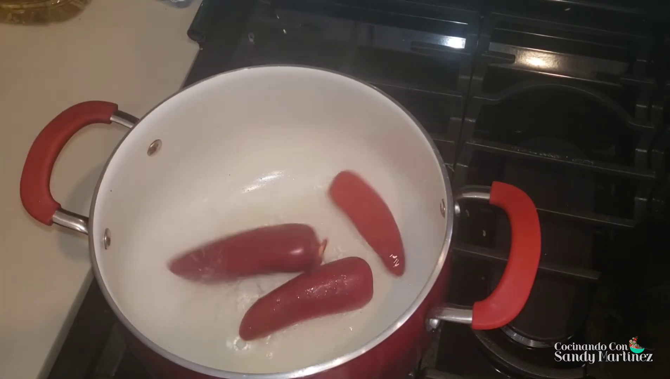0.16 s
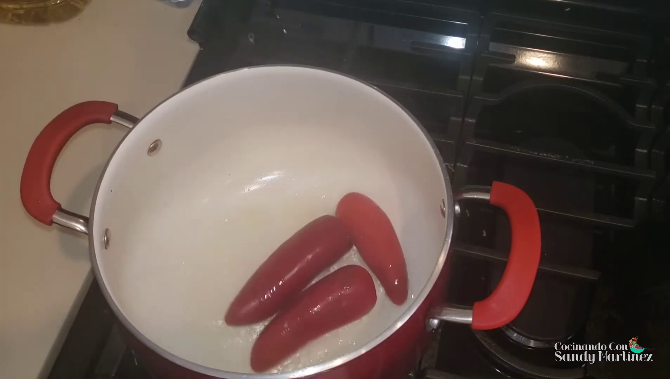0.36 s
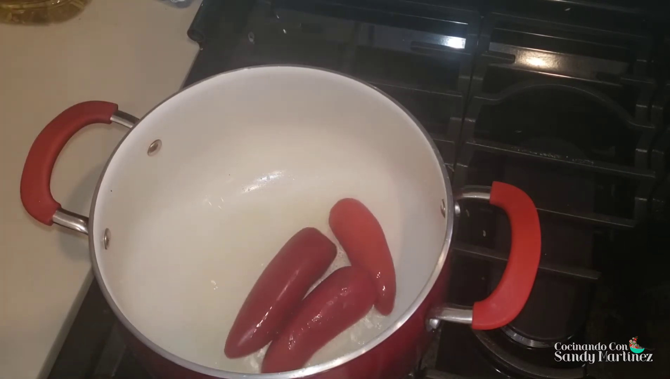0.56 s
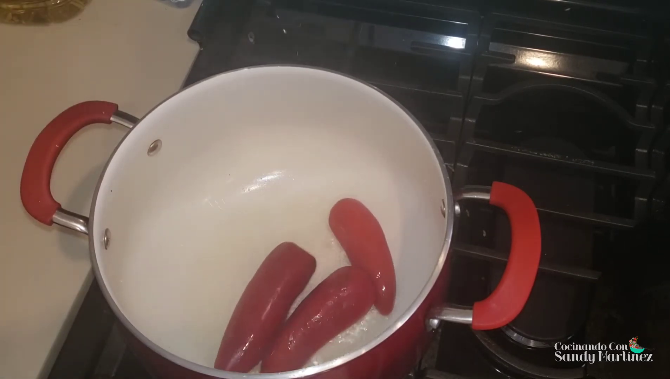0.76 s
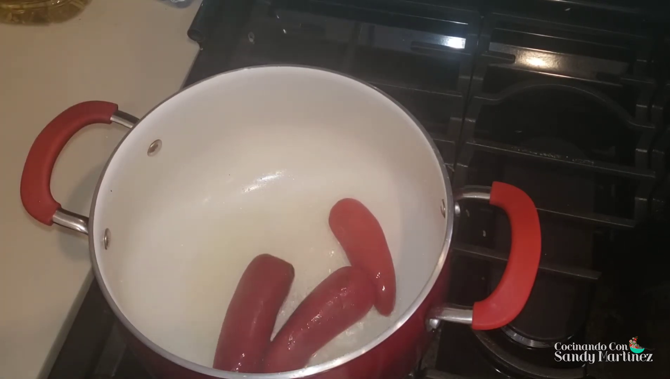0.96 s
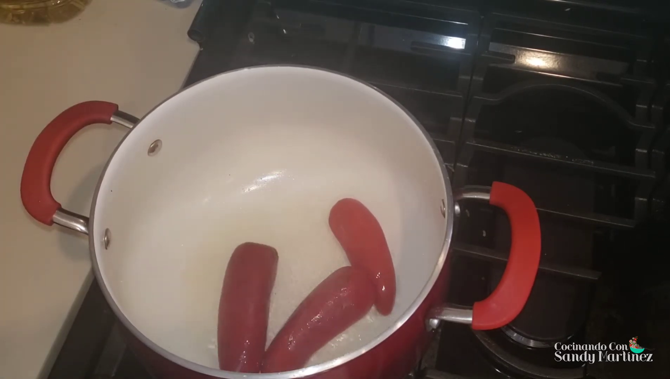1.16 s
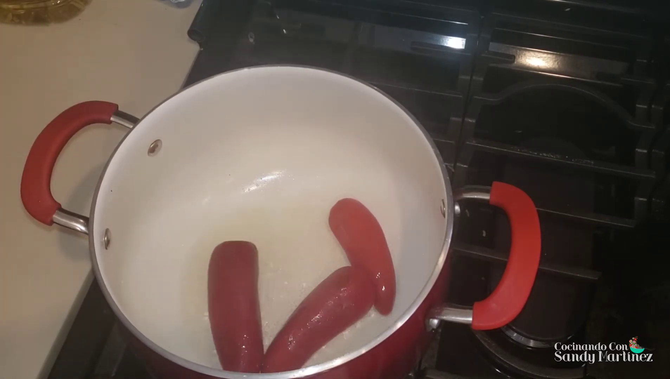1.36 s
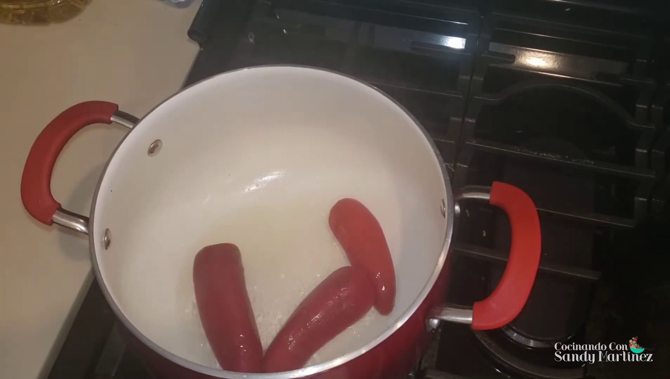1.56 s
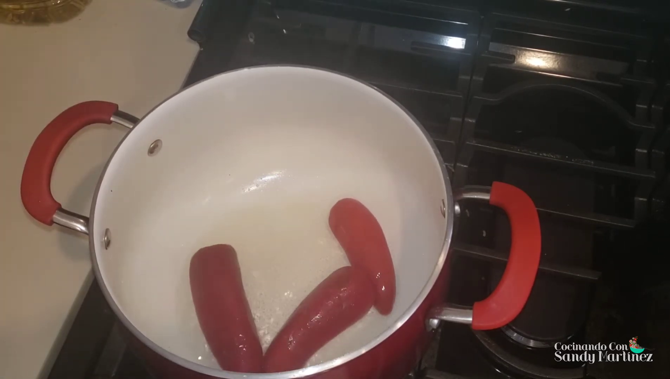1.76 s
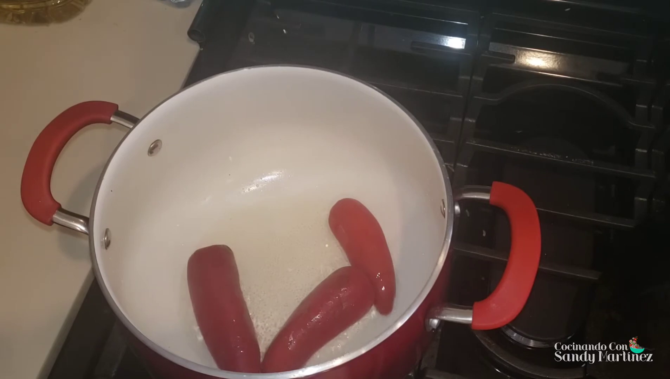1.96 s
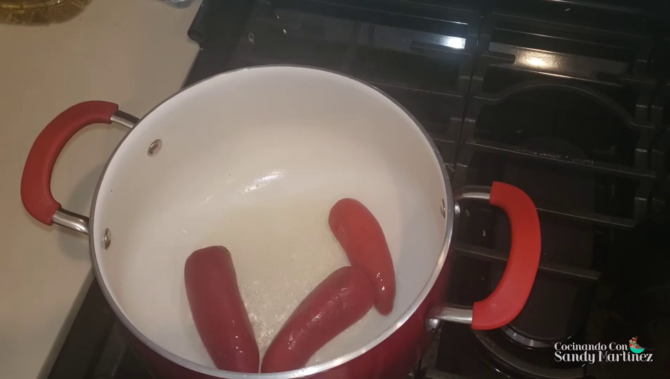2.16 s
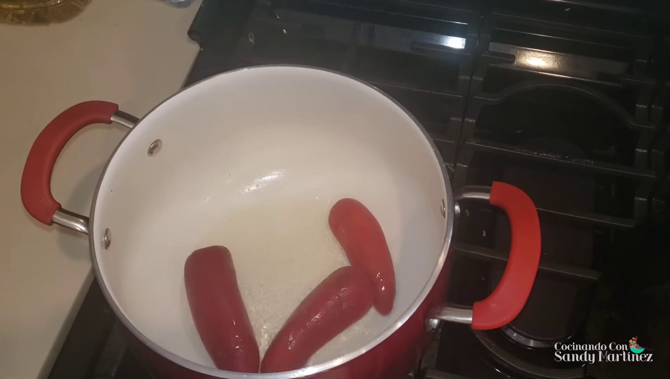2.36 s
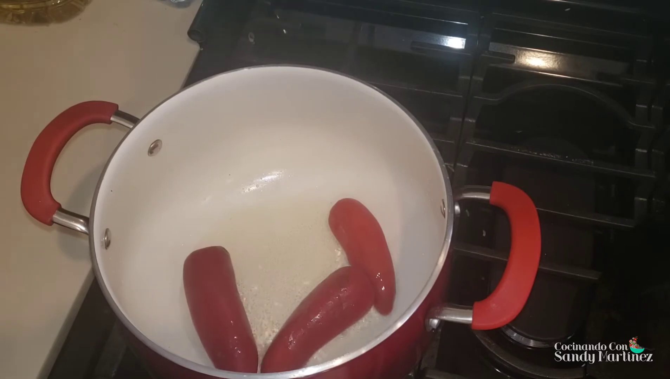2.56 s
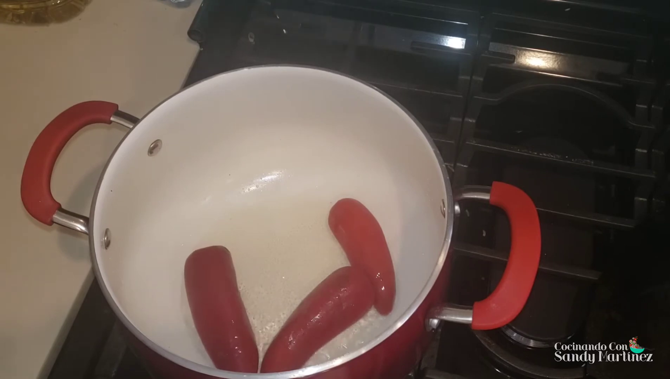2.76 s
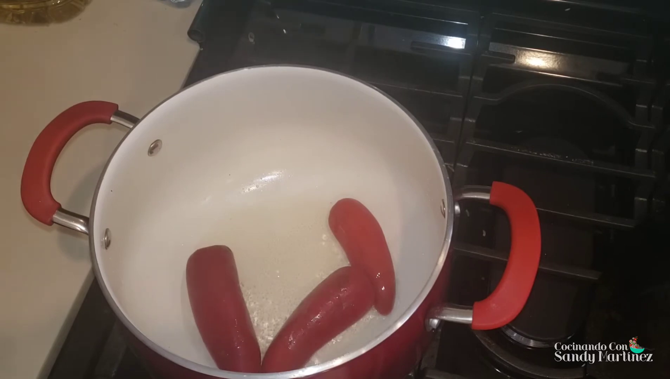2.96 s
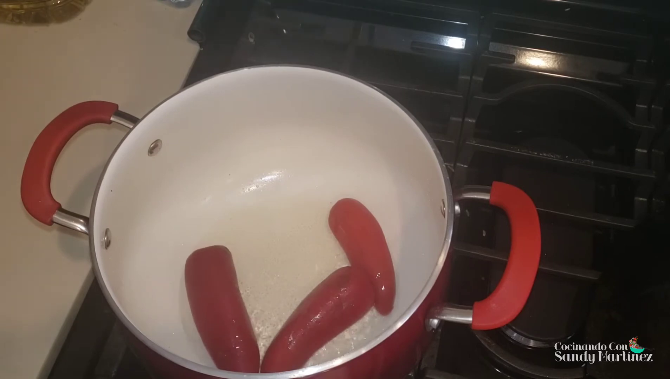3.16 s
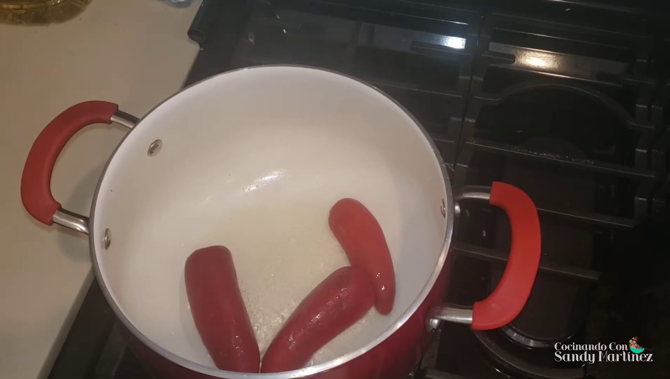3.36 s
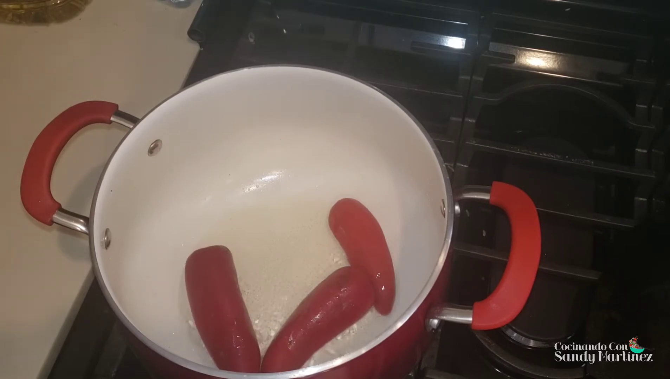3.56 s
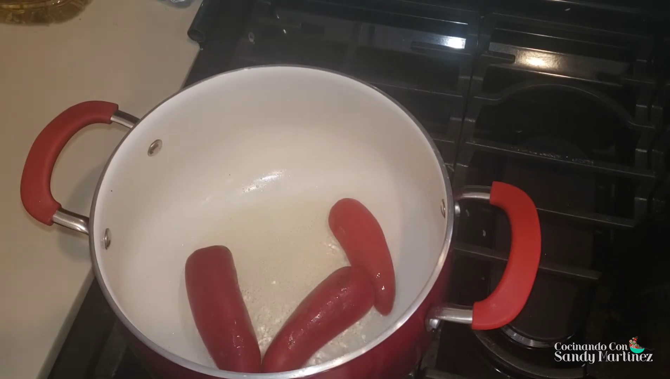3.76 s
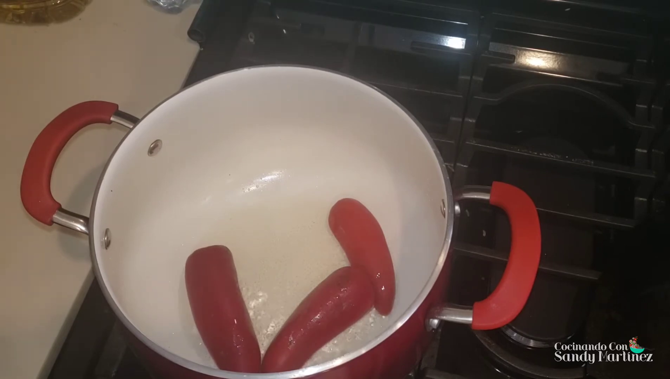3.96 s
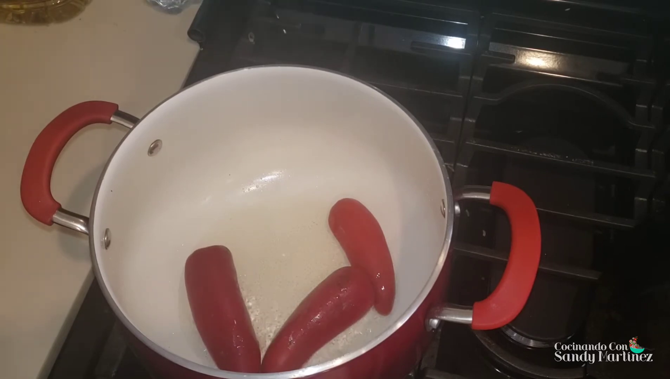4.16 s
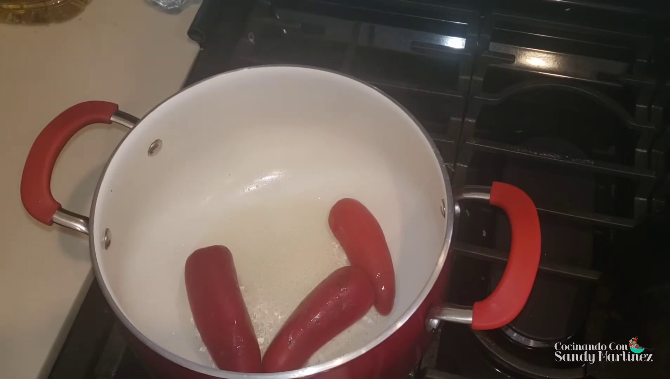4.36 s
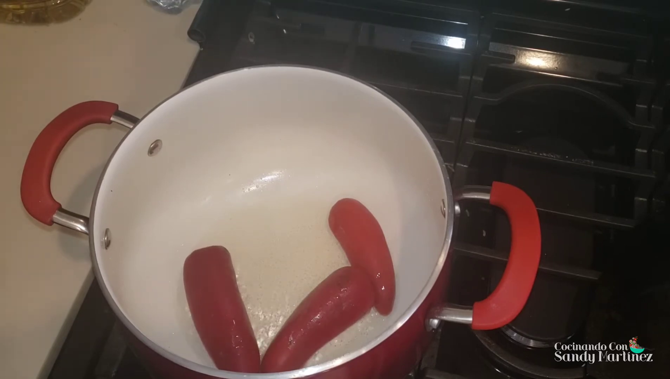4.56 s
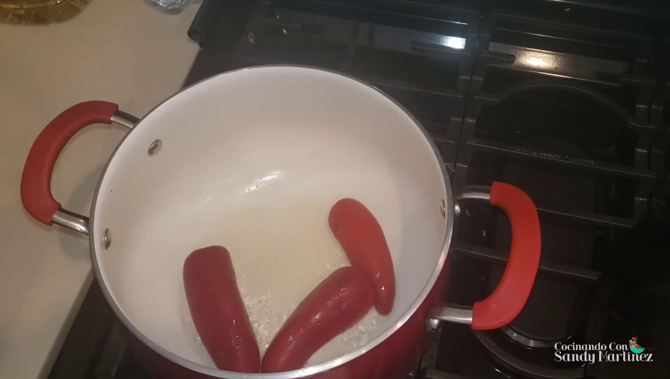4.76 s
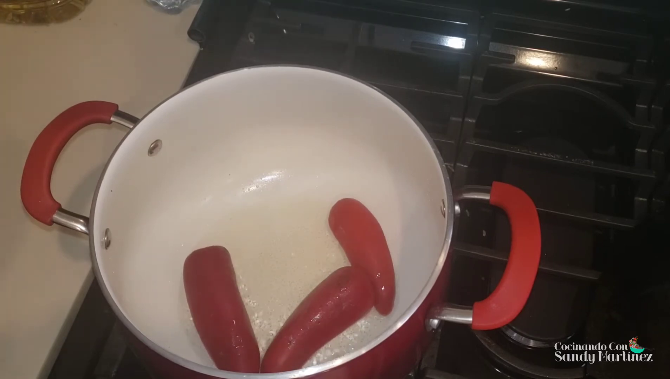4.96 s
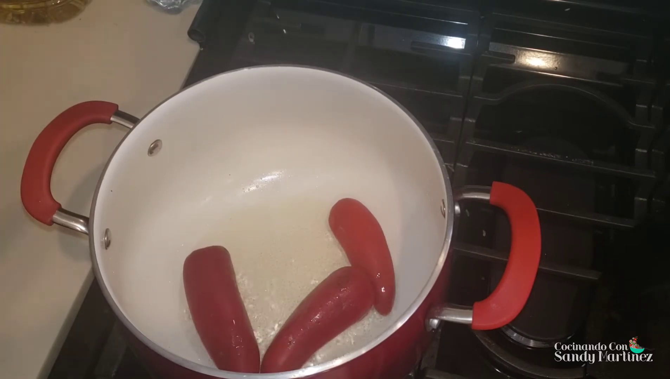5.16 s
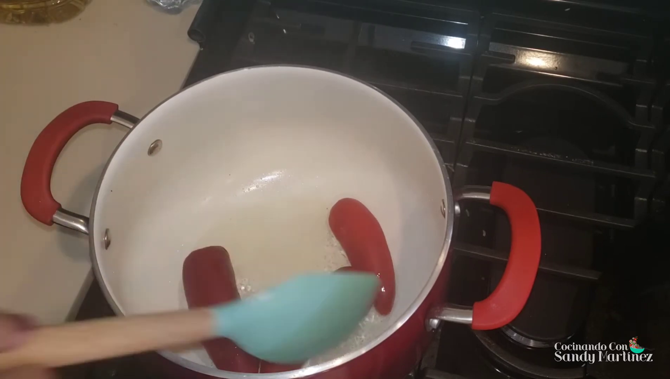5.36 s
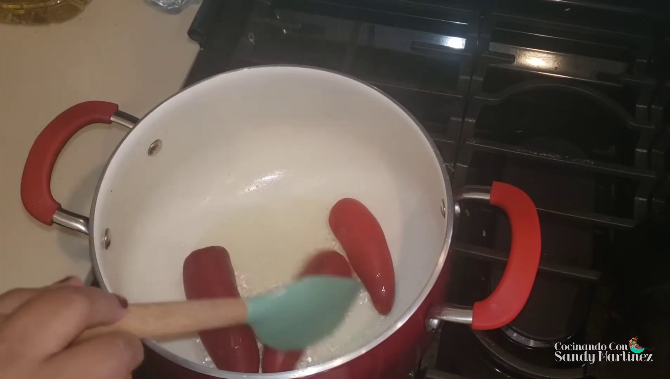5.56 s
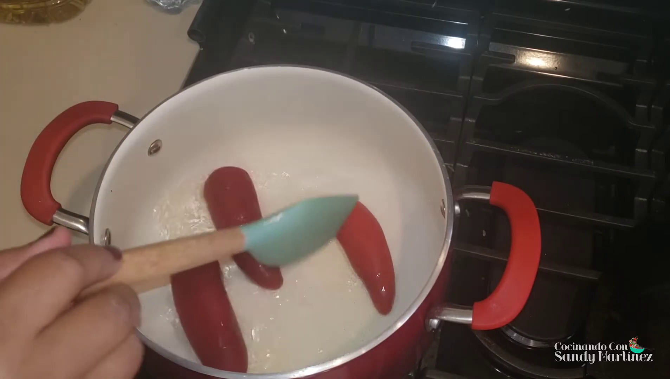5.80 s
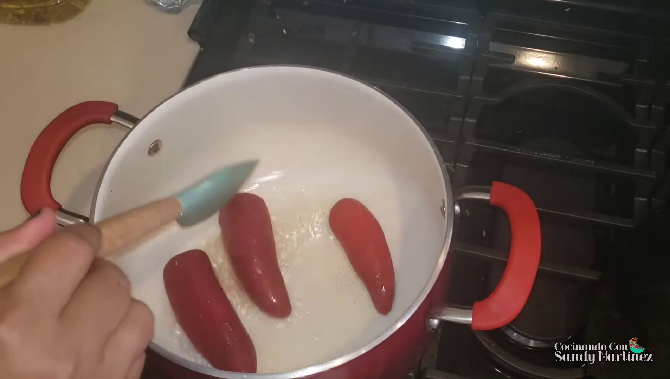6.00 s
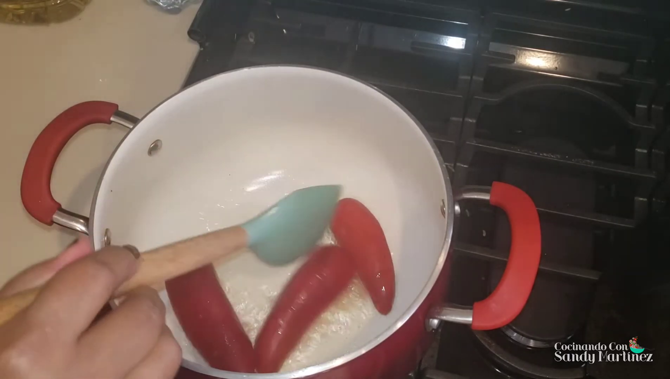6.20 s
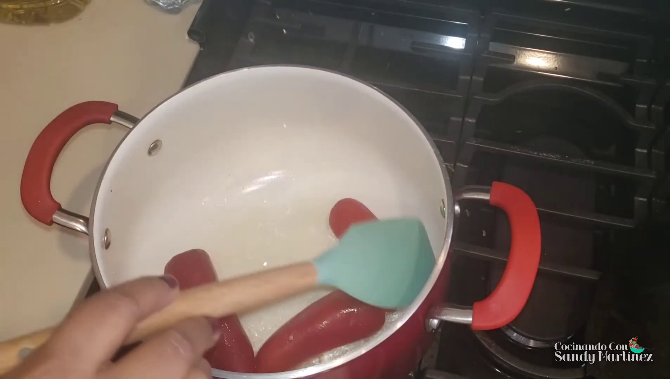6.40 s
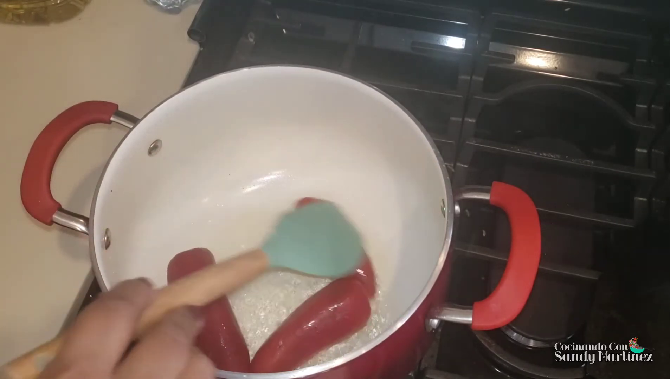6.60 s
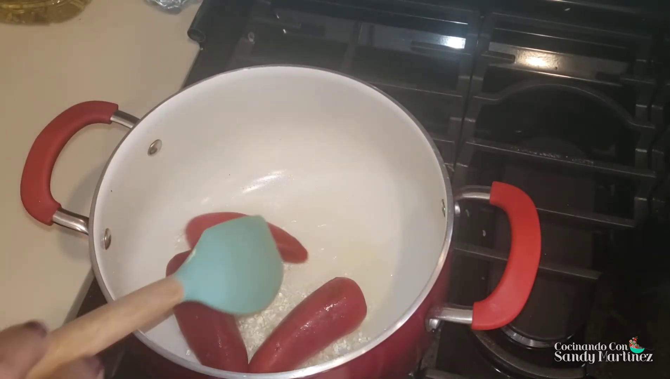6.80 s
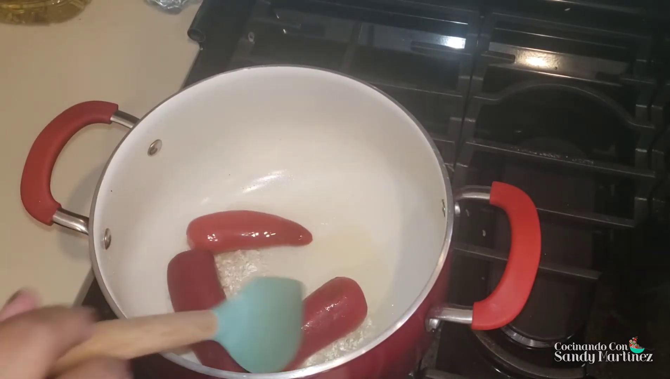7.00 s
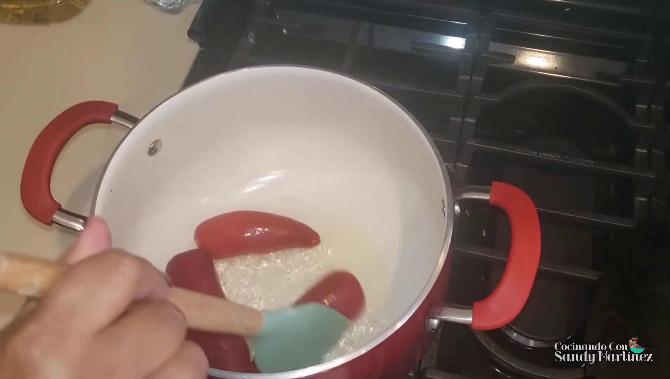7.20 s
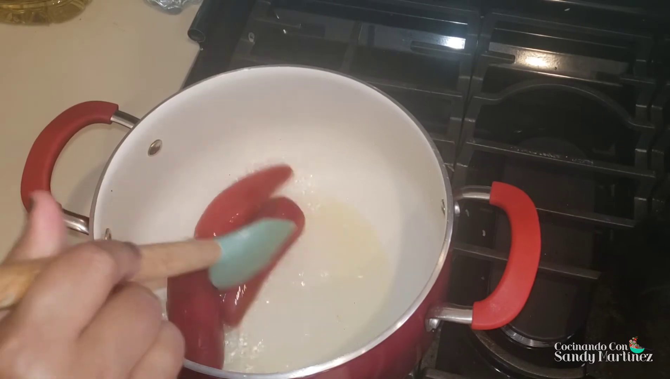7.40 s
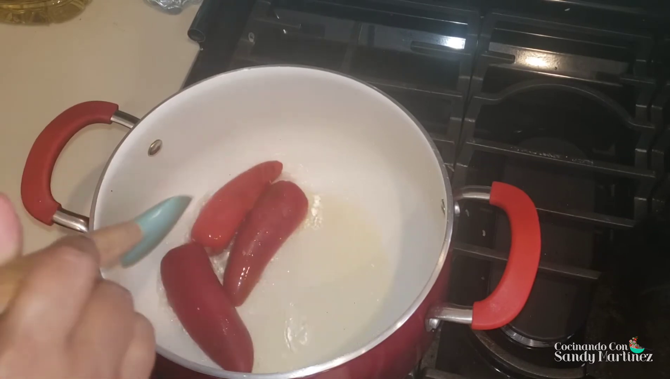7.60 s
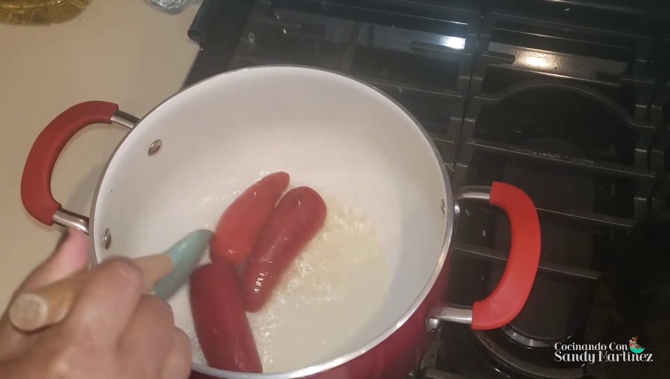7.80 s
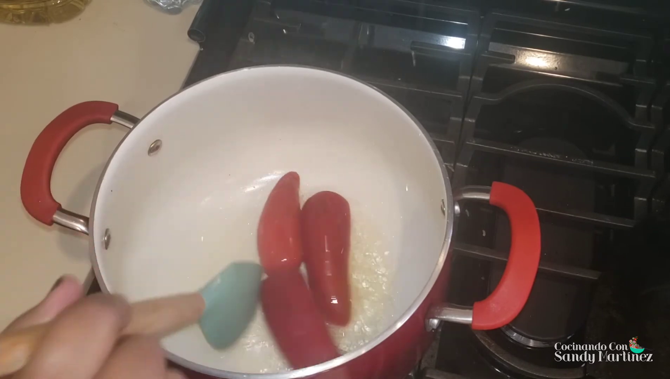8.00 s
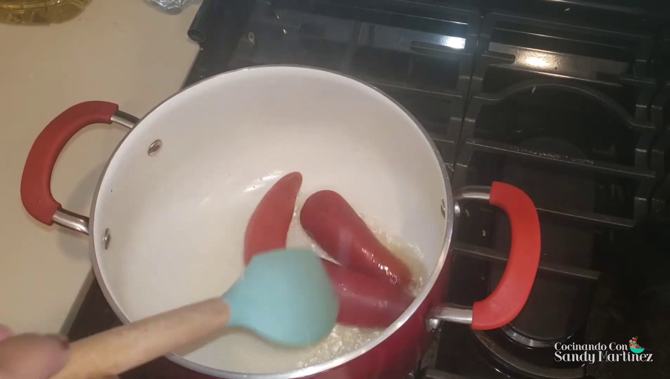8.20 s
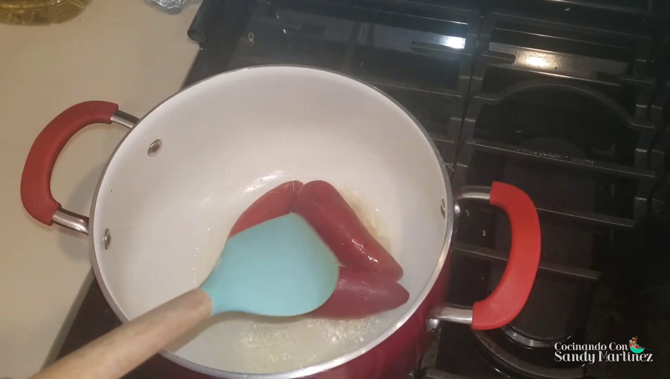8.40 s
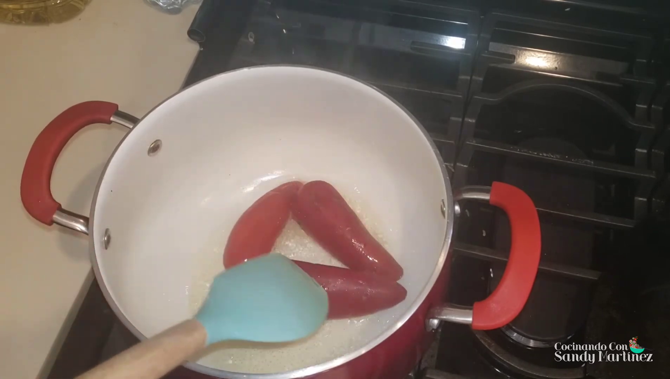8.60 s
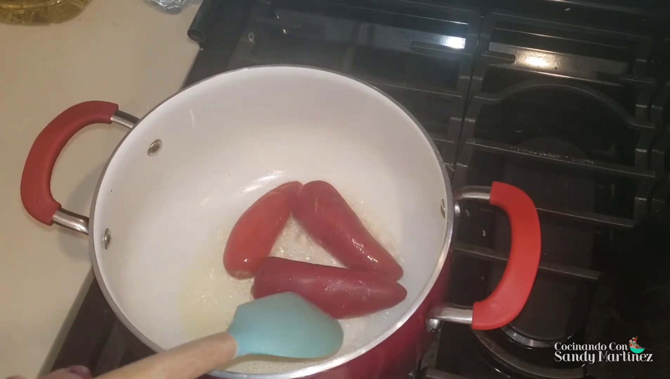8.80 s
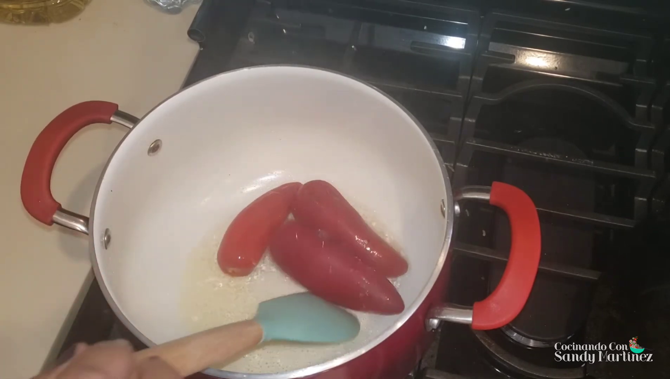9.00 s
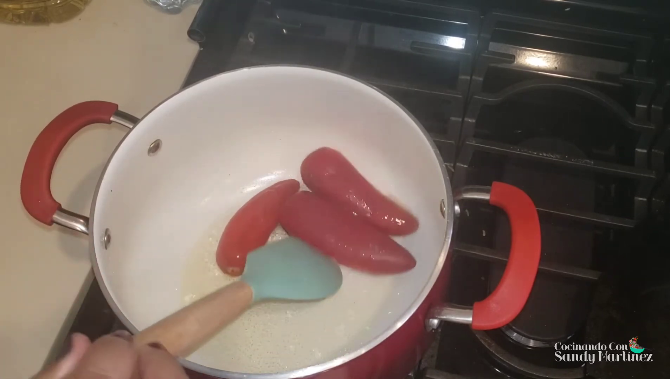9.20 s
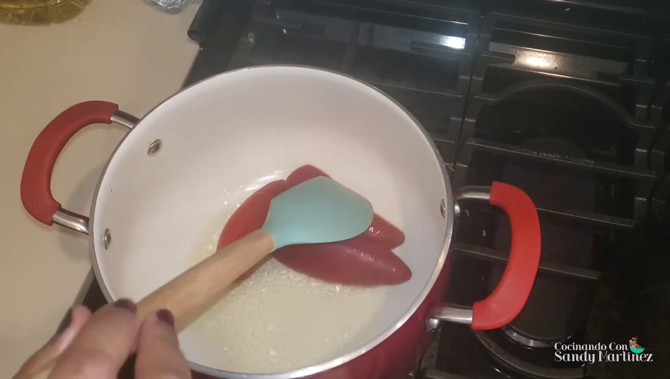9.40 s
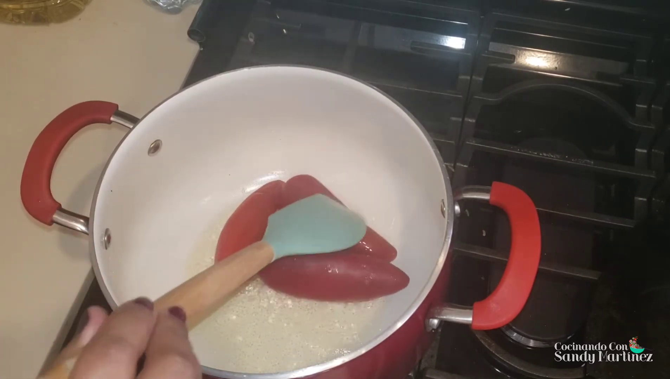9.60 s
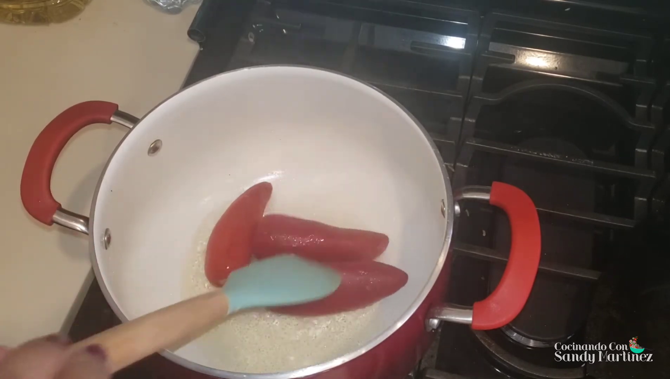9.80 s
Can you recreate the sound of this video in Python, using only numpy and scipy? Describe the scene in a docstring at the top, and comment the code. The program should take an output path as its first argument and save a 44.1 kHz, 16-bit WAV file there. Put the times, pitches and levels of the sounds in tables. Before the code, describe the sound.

Close stereo sound of oil crackling in a metal pot in a home kitchen. Rounded, high bubble pops and dry snaps come irregularly over light hiss, with a slight ring from the pot. The first half is fairly calm; after that, stirring brings dull knocks, low stove thumps and denser, sharper sputtering that swells and falls. Low traffic hum and rumble sit quietly underneath. No voice.

```python
"""Peppers frying in a pot

Peppers fry in hot oil in a metal pot. Steam bubbles pop (rising chirps) and water drops spit (short noise bursts)
over a fine sizzle of shaped noise, and the pot and a pocket of air in it ring along.
A spatula knocks the pot (noise through ringing modes) and jolts the stove (short low swings).
Engines drone in the street (a wavering tone with overtones) over a low rumble, and the level dips once.
The right microphone port faces the pot; the left one is shaded and dull."""
import sys
import numpy as np
from scipy import signal
from scipy.fft import rfft, irfft
from scipy.io import wavfile
from scipy.ndimage import uniform_filter1d

SR = 44100
rng = np.random.default_rng(int(sys.argv[2]) if len(sys.argv) > 2 else 0)


def boost(x):
    """Linear amplitude factor 10**(x/20) for a level x in decibels (scalar or array-like)."""
    u = np.asarray(x, float) / 20
    return 10 ** u


def output_pcm(signal):
    """Save a mono or channel-first signal as 16-bit PCM at the path in sys.argv[1].

    Samples are clipped to [-1, 1] before scaling.
    """
    pcm = np.clip(np.atleast_2d(signal).T, -1, 1) * 32767
    wavfile.write(sys.argv[1], SR, np.round(pcm).astype(np.int16))


N = 434385  # length in samples

# Bubbles that pop loudly. Each row: start in seconds, bubble level in dB, bubble pitch in Hz,
# snap and low plop in dB relative to the bubble (all before the mixing in pops()).
LOUD_POPS = [(0.0937, -21.5, 2760, 4, -34), (0.176, -5, 5130, -25, -37), (0.3187, 0, 4400, -18, -38),
             (0.418, -8, 3670, -14, -39), (0.514, -10, 2600, -18, -41), (0.5982, -16, 3040, 0, -26),
             (0.7083, -20, 2980, 0, -5.5), (0.7782, -17, 2730, -5, -31), (0.8303, -11, 3070, -2, -31),
             (0.8717, -23, 4060, -20, -2.5), (0.8912, -13, 2750, -6, -21), (0.897, -16, 2730, -6, -32),
             (0.9368, -16, 2800, 2, -12), (0.986, -17.5, 2700, -38, -46), (1.0014, -20.5, 2060, -20, -18),
             (1.0247, -19, 3570, -23, -43), (1.051, -16, 3020, -30, -43), (1.087, -22, 2060, -30, -39),
             (1.1007, -23, 2590, -15, -5), (1.117, -12, 3600, -27, -29), (1.1314, -21, 2090, -22, -12),
             (1.1566, -10, 2960, -27, -29), (1.2242, -3.5, 3670, -15, -35), (1.2477, -19, 2720, -22, -35),
             (1.29, -23, 2750, -13, 0), (1.48, -27.5, 3060, -26, -0.5), (1.5447, -14, 2970, -4, -29),
             (1.587, -17, 2720, -5, -39), (1.6486, -20.5, 2850, 7, -36), (1.731, -16.5, 3000, -10, -44),
             (1.7748, -31.5, 1980, 15.5, -34), (1.799, -20, 2650, 3, -26), (1.862, -12, 3720, -17, -38),
             (1.914, -21, 2960, 1, -19), (2.028, -28, 2430, 10.5, -2), (2.049, -15.5, 2710, -2, -5.5),
             (2.0912, -26.5, 3080, -10, -9), (2.117, -14, 2900, -1, -28), (2.165, -6, 2800, -8, -12),
             (2.2667, -12, 2740, -22, -22), (2.304, -23, 3620, 3, -9), (2.387, -18, 2400, 4, -5.5),
             (2.582, -11.5, 3170, -14, -24), (2.6041, -13.5, 3660, -6, -20), (2.851, -16.5, 3450, -6, -23),
             (2.9105, -22, 3430, -16, -37), (3.0043, -11.5, 3680, -7, -14), (3.038, -17.5, 3600, 2, -6),
             (3.208, -21, 2380, 1, 0), (3.2518, -31.5, 1995, 9, -29), (3.4185, -7.5, 3580, -9, -20),
             (3.342, -17.5, 3300, -2.5, -14), (3.506, -13, 2850, -10.5, -1.5),
             (3.5296, -10, 3070, -9.5, -10), (3.6118, -9.5, 3060, -5, -32), (3.689, -5.5, 4590, -7.5, -16),
             (3.803, -27, 1996, 13, -30), (3.8438, -11.5, 3600, -27, -29.5), (3.865, -10.5, 3920, -5, -31),
             (4.053, -13, 2770, -18, -4), (4.0952, -13, 1980, -24, -13.5), (4.141, -10.5, 3080, -11, -17),
             (4.2288, -15, 2894, 0.5, -4.5), (4.3923, -20.5, 2840, 5, -5.5), (4.5402, -12, 3700, -23, -32),
             (4.5758, -18, 1940, -15, -7), (4.6, -1.5, 2970, -10, -24), (4.6743, -17, 2800, 4, -32),
             (4.7623, -17, 3480, -5, -31), (4.792, -16.5, 2876, 2, -4.5), (4.91, -27.5, 2855, 6.5, -28),
             (5.06, -30.5, 2807, 4, 6), (5.1309, -13.5, 2860, 1.5, -10), (5.229, -14, 3505, -23, -47),
             (5.26, -15.5, 2850, -6, -29), (5.2807, -11, 2890, -8.5, -33), (5.3834, -20, 4310, -19, -13),
             (5.4317, -21, 3530, -1, -6.5), (5.457, -13, 4650, -15, -18), (5.592, -14, 3530, -6.5, -35),
             (5.691, -5, 4240, -17, -25), (5.88, -1, 4400, -12, -26), (5.964, -21, 2750, 6, -31),
             (5.9925, -10, 3600, -24, -42), (6.0478, 1, 4730, -22, -43), (6.115, -9.5, 2360, -7, -27),
             (6.1407, -12.5, 2950, -1, -32), (6.185, -16, 3340, -9, -14), (6.285, -9.5, 3730, -7, -13),
             (6.336, -13.5, 3700, -25, -25), (6.3547, -8.5, 4250, -6, -38), (6.452, -11.5, 2720, -25, -9),
             (6.565, -17, 2920, -3, -23), (6.63, -22, 1750, -10, -6), (6.7495, -11.5, 3500, -0.5, -12),
             (6.848, -10, 2450, -6, -17), (6.873, -10, 2540, -10.5, -13), (7.028, -15, 3570, -2.5, -11),
             (7.0925, -11, 4200, -20, -34), (7.2706, -9, 3940, -3, -27), (7.308, -15, 2750, -12, -6.5),
             (7.402, -1.5, 3190, -18, -21), (7.477, -4, 3850, -8, -32), (7.5024, -16, 2730, -20, -34),
             (7.7097, -15.5, 2770, -1.5, -10), (7.749, -11.5, 2250, 2, -29), (7.85, -10, 2730, 5, -11),
             (7.901, -4.5, 2210, -4.5, -12), (8.01, -6.5, 2260, -5, -11), (8.0321, -14, 2290, -2, -18),
             (8.2342, -11, 2300, 4.5, -37), (8.3345, -19, 2400, 4.5, -33), (8.3689, -17, 2370, 1, -19),
             (8.4168, -3.5, 3690, -9, -20), (8.531, -17, 1960, -8, -28), (8.5498, -16, 2370, -6, -22),
             (8.6174, -8, 2780, -2, -11), (8.667, -10.5, 3070, -6, -9), (8.6799, -15, 3080, -3, -13),
             (8.732, -17, 2350, 3, -16), (8.89, -7.5, 4300, -8.5, -32), (8.947, -11, 2800, -28, -42),
             (8.978, -12, 2190, -4, -30), (9.05, -7.5, 3500, -28, -49.5), (9.1052, -6.5, 4460, -18, -33),
             (9.1224, -12, 2400, 0, -29.5), (9.259, -7, 1740, -23, -27), (9.295, -18.5, 3470, 0, -21),
             (9.318, -10.5, 1980, 2, -11), (9.3753, -16, 2100, -2, -4.5), (9.431, -15, 2446, -5, -41),
             (9.4565, -15, 4550, -3.5, -33), (9.4723, -10.5, 2430, -1.5, -36), (9.533, -8, 4100, -12, -37),
             (9.6185, -6.5, 3750, -10, -23)]
# Water drops that burst and spit. Each row: start in seconds, level in dB,
# fizz after the crack in dB relative to that level (before the mixing in spits()).
LOUD_SPITS = [(0.1074, -9, -17), (0.2818, -10, -6), (0.739, -9, -15), (0.7597, -3, -27), (0.895, -7, -10.5),
              (1.203, -16, -11), (1.2967, -13, -4), (1.3254, -17, -12), (1.347, -13, -9), (1.427, -9, -11),
              (1.5862, -11, -11), (1.6388, 2.5, -32), (1.6724, -14.5, 0), (1.8627, -5, -23.5),
              (1.9148, -13.5, -5.5), (1.934, -27, 6), (2.163, -20, -7), (2.2423, -23, -3),
              (2.3736, -19, -5), (2.41, -11.5, -5), (2.527, -17, -2.5), (2.6679, -8, -18),
              (2.8499, -2, -5.5), (3.0008, -12, -10), (3.2074, -13, -42), (3.2502, -11, -13),
              (3.481, -7, -7), (3.619, -14, 0), (3.688, -12.5, 1.5), (3.803, -7.5, -11), (4.0507, -20, 3),
              (4.402, -17, 0.5), (4.6295, -3.5, -8.5), (4.6725, -12, -15), (4.91, -19.5, 1),
              (5.59, -20, -6), (5.687, -14, -9), (5.77, -10, -5), (5.808, -1.5, -11), (5.8454, -12, -5),
              (5.864, -12, -9), (5.916, -3, -7), (5.964, -5, -16), (5.9854, -10, -21), (6.047, -2, -11),
              (6.0785, -12, -7), (6.097, -7, -22), (6.118, -6, -8), (6.1857, -4, -15), (6.165, -3, -18),
              (6.2238, -5, -16), (6.236, -1, -16), (6.271, -14, -7), (6.3405, -9, -10), (6.356, -9, -20),
              (6.395, -6, -13), (6.4277, -7, -22), (6.4426, -16, -16), (6.476, -19, -22), (6.7174, -9, -13),
              (6.811, -7, -6), (6.94, -20, -7), (7.1337, -21, -18), (7.161, -9, -12), (7.267, -6, -6),
              (7.353, -18, 3), (7.475, -10, -5), (7.5187, -7, -9), (7.5426, -12, -17), (7.633, -7.5, -5),
              (7.689, 0, -23), (7.807, 2, -20), (7.915, -20, -20), (7.955, -18, -1), (7.9735, 7.5, -17),
              (8.0626, 1, -24), (8.154, -9, -23), (8.1742, -3, -16), (8.1923, -11, -27), (8.2192, 3, -19),
              (8.234, -5, -17), (8.258, -2.5, -9), (8.36, -1, -15), (8.3774, -8, -6), (8.4166, -8, -20),
              (8.474, -12, -7), (8.617, -7, -10), (8.6757, -11, -10), (8.752, -9, -7), (8.8154, -10, -7),
              (8.9027, -13, -19), (9.058, -14, -2), (9.1243, -12, -11), (9.1643, -15, -15), (9.29, -8, -13),
              (9.3086, -6, -11), (9.468, -3, -8), (9.558, -9, -16), (9.633, -17, -6), (9.7163, -3, -7.5),
              (9.773, -11, -12), (9.7935, 1, -21)]
# Frying levels: one long row holds the steady calm frying, the others are swells over it.
# Each row: start in seconds, hold in seconds, steam bubbling in dB, water spray in dB
# (each layer adds its own offset).
FRYING_LEVELS = [(0.0, 0.012, -39, -32.5), (.05, 0.051, -52, -37), (.165, 9.7, -40.5, -37),
                 (0.165, 0.13, -26.5, -19), (.5, 0.39, -32, -35.5), (.76, 0.72, -30.5, -34.5),
                 (1.3, 0.028, -37, -32.5), (2.05, 0.022, -33.5, -34), (2.649, 0.084, -33, -35.5),
                 (3.501, 0.13, -39, -36.5), (4, 0.41, -41.5, -58), (5.0, 0.59, -40, -44),
                 (5.689, 0.12, -26.5, -27.5), (5.82, 0.048, -22.5, -21.5), (5.97, 0.34, -48, -28.5),
                 (6.3, 1.3, -34, -31), (7.1, 0.47, -37, -56), (7.499, 0.63, -25.5, -25),
                 (7.8, 0.11, -45, -33), (8.0, 0.4, -32, -29.5), (8.4, 0.52, -27, -30),
                 (9.15, 0.29, -47, -34.5), (9.45, 0.49, -31.5, -30.5), (9.749, .1, -27, -27.5)]
# The low simmer swells and ebbs slowly. Each row: time in seconds, change in dB.
SIMMER_SWELL = [(0, -1), (1.0, -5.5), (1.6, -2), (2.4, 0.5), (5.6, 4), (8.2, -0.5), (9.0, -1), (9.6, -9.5),
                (9.85, 5.5)]
# Colours of the three sizzling noises. Each row: pitch in Hz, relative level in dB per Hz.
BUBBLING_COLOUR = [(760, -52), (1300, -28), (1450, -31), (1900, -22), (2100, -15), (2520, -40), (2740, -27),
                   (2870, -7), (3550, 5.5), (3860, 7.5), (4290, 14.5), (8000, -26), (10400, -55),
                   (17600, -120)]
SPITTING_COLOUR = [(3530, -9.5), (6000, 3), (8670, -4), (11100, -4), (12300, -1), (14900, -1.5),
                   (15800, 5.5), (16500, -38)]
SIMMER_COLOUR = [(88, -34), (150, -1), (335, -9), (539, 12.5), (794, -27), (896, -34), (1110, 3), (1310, 3),
                 (1700, -11), (2210, -34), (3740, -120)]
# What the pot and the air in it ring with. Each row: pitch in Hz, width in Hz, relative level in dB.
POT_RINGS = [(550, 70, -3), (765, 90, -2), (1145, 60, 0), (2350, 60, -9), (2760, 100, -2), (3000, 120, -4),
             (3570, 130, -1), (4250, 160, -3)]
# A pocket of air between the peppers rings too, and its pitch moves as they roll.
# Each row: time in seconds, pitch in Hz, level in dB relative to the sound that drives it.
AIR_POCKET = [(0.4, 2350, -19), (0.85, 2130, -5), (1.1, 2040, 12), (1.3, 2000, 7), (1.6, 1950, 4),
              (4.602, 1930, 5.5), (6.6, 1920, 2), (7.9, 2280, -19), (8.4, 2110, 4), (9.0, 2130, 8),
              (9.85, 2040, -10)]
# Echo in the pot and off the walls. Each row: pitch in Hz, time to fall by 60 dB in seconds.
ECHO_TIMES = [(300, 0.03), (2500, 0.13), (7000, 0.08), (15000, 0.01)]
# Knocks on the pot. Each row: start in seconds, level in dB (before the cut in scene()),
# length of the rub in seconds, brightness in dB per octave.
KNOCKS = [(4.053, -21, 0.0065, 7.5), (4.143, -24, 0.041, 9), (4.294, -23.5, 0.0072, 7.5),
          (5.318, -22, 0.0057, 20), (5.331, -22, 0.0047, 11.5), (5.507, -23.5, 0.016, 6.5),
          (5.543, -17, 0.0064, 5.5), (5.823, -21.5, 0.041, 11), (6.413, -23.5, 0.022, -1),
          (6.43, -18, 0.028, -2), (6.462, -29, 0.048, 3), (6.697, -19.5, 0.032, -4), (6.709, -21, 0.033, 3),
          (6.743, -24, 0.049, 5), (6.797, -24, 0.013, 10), (6.812, -22.5, 0.012, 19),
          (7.347, -18, 0.022, 13)]
# Low modes of the pot wall. Each row: pitch in Hz, level in dB, time to fall by 60 dB in seconds.
WALL_MODES = [(140, -9, .07), (195, 0, .11), (290, -6, .09), (390, -9, .07), (510, -11, .06),
              (640, -7, .07), (770, -4, .055), (1150, -10, .04), (1600, -14, .03), (1980, -15, .04)]
# Jolts of the stove. Each row: start in seconds, level in dB (before each port's gain), swing rate in Hz.
JOLTS = [(6.167, -28, 51.3), (7.825, -46, 50), (7.992, -45, 45), (8.12, -38, 50), (8.154, -31.5, 50),
         (8.343, -40, 49.1), (8.384, -36.5, 45), (8.756, -32.5, 51), (9.462, -38, 47.3), (9.801, -42, 45.2)]
# One list for each stretch of engine drone. Each row: time in seconds, firing tone in Hz, its level in dB,
# overtones in dB relative to the firing tone.
ENGINE_DRONES = [
    [(0.0, 91, -52, -25), (0.318, 94.7, -62, -17), (0.892, 103.2, -53, -27), (1.55, 102.5, -63, -8.5)],
    [(1.85, 79.7, -73, -4), (2.38, 79.6, -48, -15.5), (2.67, 69.5, -48.5, -19.5), (2.8, 67.7, -51, -6),
     (3.0, 68, -44, -11), (3.19, 65.7, -43.5, -15.5), (3.43, 69.9, -65.5, -7), (3.74, 75, -49.5, -24),
     (3.95, 79.7, -41, -12.5), (4.2, 84.2, -37, -20.5), (4.58, 88.9, -32, -15), (4.86, 97.1, -46.5, -9.5),
     (5.05, 104, -48, -11.5), (5.2, 104, -50, -11)],
    [(4.9, 110.2, -42, -18), (4.996, 118.3, -43.5, -25), (5.65, 104.8, -60, -22)],
    [(5.7, 67.3, -51, -28), (5.826, 76.5, -45.5, -11), (6.4, 60.2, -53, -22)],
    [(6.3, 116.3, -51.5, -17), (6.93, 120.6, -53.5, -32), (7.98, 131.6, -53.5, -35),
     (8.8, 136.3, -61, -13.5)],
    [(8.95, 72.5, -66, -22), (9.15, 69.4, -48, -31), (9.45, 67.3, -44, -24), (9.85, 74.7, -54, -22)],
]
# Colour of the low rumble. Each row: pitch in Hz, relative level in dB per Hz.
RUMBLE_COLOUR = [(15, -25), (30, 0), (55, 15), (90, 19), (130, 0), (220, -44), (350, -39)]
# Likeness of the noises at the two ports. Each row: pitch in Hz, likeness (1 is the same).
PORT_LIKENESS = [(60, 1), (300, 0.81), (1400, 0.5), (3500, 1), (6500, 0.33), (15000, 0.03)]
# Shading of the left port. Each row: pitch in Hz, left minus right in dB.
SHADE = [(30, -6), (70, -2), (1300, -2.5), (4400, -1.5), (8100, -12), (15000, -13)]
# A brief dip of the whole sound: its middle in seconds, half its length in seconds.
DIP = (4.9, .006)


def evened(x):
    """Scales a sound to an rms of 1."""
    return x / np.sqrt(np.mean(x ** 2) + 1e-20)


def read(points, hz):
    """Reads a table between its rows, with pitch on a log axis."""
    f, value = np.transpose(points)
    return np.interp(np.log(hz + 1), np.log(f + 1), value)


def filtered(x, order, hz, kind):
    """Keeps only part of the pitch range (Butterworth filter)."""
    return signal.sosfilt(signal.butter(order, hz, kind, fs=SR, output="sos"), x)


def scatter(s, grains):
    """Lays each row of grains at its own time in seconds."""
    at = np.round(s * SR).astype(int)[:, None] + np.arange(grains.shape[1])
    return np.bincount(at.ravel(), grains.ravel(), N + grains.shape[1])[:N]


def frying_level(s, column, fade_db_per_s, rise_s=0.0056):
    """Level in dB at times s: each row rises, holds and fades, and their powers add."""
    table = np.transpose(FRYING_LEVELS)[:, :, None]
    start, held, peak_db = table[0], table[1], table[column]
    t = np.arange(0, N / SR + .01, .002)
    fade_db = fade_db_per_s * np.maximum(t - start - held, 0)
    rise = np.clip((t - start) / rise_s + .5, 0, 1)
    strength = boost(peak_db - fade_db) * rise
    return np.interp(s, t, 10 * np.log10((strength ** 2).sum(0) + 1e-7))


def steam_level(s):
    """Steam bubbling in dB; it fades slowly after a swell."""
    return frying_level(s, 2, fade_db_per_s=28)


def spray_level(s):
    """Water spray in dB; it fades faster than the steam."""
    return frying_level(s, 3, fade_db_per_s=42)


def simmer_level(s):
    """Low simmer in dB: a slow swell plus a small share of the steam and spray changes."""
    swell_db = np.interp(s, *np.transpose(SIMMER_SWELL))
    return -51.5 + swell_db + 0.088 * (steam_level(s) + 35) + 0.14 * (spray_level(s) + 35)


def pops(s, db, hz, snap_db, plop_db, plop_hz=950, size=600):
    """A bursting bubble: a sharp snap, a few cycles of rising pitch and a low plop."""
    t = np.arange(size) / SR
    u = rng.random((len(s), 4))
    turns = hz[:, None] * t * (1 + 6 * t)  # cycles so far; the pitch rises
    bubble = (1 - np.exp(-t / 0.00017)) * np.exp(-turns / (1.8 + 4.5 * u[:, :1] ** 2))
    plop_turns = plop_hz * (.7 + 1.0 * u[:, 1:2]) * t
    plop = boost(plop_db)[:, None] * np.sin(2 * np.pi * plop_turns) * np.exp(-plop_turns / 1.1)
    plop = filtered(plop, 2, 400, "high")
    snap_fade = np.exp(-t / .0003) + .18 * np.exp(-t / .004)
    snap = boost(snap_db)[:, None] * rng.standard_normal(turns.shape) * snap_fade
    snap = filtered(snap, 3, [1700, 8000], "band")
    lean = u[:, 2:3] - .5  # each port hears the pop from its own angle
    ports = []
    for side in (1, -1):
        chirp = filtered(bubble * np.sin(2 * np.pi * turns + 2.2 * side * lean), 3, 1500, "high")
        gain = boost(db[:, None] + 3 * side * lean)
        ports.append(scatter(s, gain * (chirp + 2.4 * snap + plop)))
    return np.array(ports)


def spits(s, db, fizz_db, size):
    """A bursting drop: a very short bright crack, then a dying, grainy fizz of falling droplets."""
    crack_hz, crack_s, fizz_s = 13300, 0.00017, 0.012
    t = np.arange(size) / SR
    u = rng.random((len(s), 4))
    late = (t - 2 * crack_s) / (crack_s * (.5 + u[:, :1]))
    burst = np.exp(-late ** 2)
    grains = evened(uniform_filter1d(rng.standard_normal((len(s), size)), size=30, axis=1))
    fizz = boost(fizz_db)[:, None] * np.exp(-t / fizz_s) * boost(4 * grains) / 1.7
    ports = []
    for side in (1, -1):  # each port gets its own spray
        crack_turns = crack_hz * (.85 + .3 * u[:, 1:2]) * t + side * u[:, 2:3]
        crack = burst * np.cos(2 * np.pi * crack_turns)
        noise = (fizz + .5 * burst) * rng.standard_normal(fizz.shape)
        bright = filtered(noise, 2, 9000, "high")
        body = filtered(noise, 3, [2300, 9000], "band")
        ports.append(scatter(s, boost(db)[:, None] * (boost(-3) * crack + bright + boost(-8) * body)))
    return np.array(ports)


def crackle(per_s=560, spread_db=4.9):
    """Many small pops and spits in loose clumps, as strong as the oil is frying; calm oil snaps drier."""
    u = rng.random((round(per_s * N / SR), 8))
    pop_s, spit_s = u[:, 0] * N / SR, u[:, 1] * N / SR
    clumps_db = 2.2 * evened(uniform_filter1d(rng.standard_normal(N // 100 + 1), size=10))
    pop_clump_db = clumps_db[(pop_s * SR / 100).astype(int)]
    spit_clump_db = clumps_db[(spit_s * SR / 100).astype(int)]
    size_db = spread_db * np.minimum(-np.log(u[:, 2:4]), [2.2, 3.0])  # few are large
    # the air in the pot answers best at these pitches; the other bubbles spread freely
    favoured = np.array([hz for hz, width, db in POT_RINGS if hz > 2500])
    hz = favoured[(u[:, 7] ** 1.3 * len(favoured)).astype(int)] * (.99 + .06 * u[:, 4])
    hz = np.where(u[:, 5] < .4, hz, 2500 * 2.24 ** u[:, 4])
    steam_db = steam_level(pop_s)
    snap_db = -22 + 16 * u[:, 6] - 0.35 * (spray_level(pop_s) + 38)
    plop_db = simmer_level(pop_s) - steam_db + 20 * (u[:, 6] ** 2 - .4)
    pop_db = steam_db + 0.8 + pop_clump_db + size_db[:, 0]
    spit_db = spray_level(spit_s) - 1.5 + spit_clump_db + size_db[:, 1]
    small_pops = pops(pop_s, pop_db, hz, snap_db, plop_db, plop_hz=1230, size=400)
    return small_pops + spits(spit_s, spit_db, np.full(len(spit_s), -30.), size=200)


def pot(x, ring_db=-14, pocket_width_hz=60):
    """Adds the ringing of the pot and of the moving air pocket."""
    s, pocket_hz, pocket_db = np.transpose(AIR_POCKET)
    now = np.arange(N) / SR
    r = np.exp(-np.pi * pocket_width_hz / SR)
    # shift the pocket's pitch down to zero, smooth, and shift back: a resonance that can move
    turn = np.exp(2j * np.pi * np.cumsum(np.interp(now, s, pocket_hz)) / SR)
    smooth = signal.lfilter([1 - r], [1, -r], x / turn)
    pocket = 2 * boost(np.interp(now, s, pocket_db)) * (turn * smooth).real
    t = np.arange(3000) / SR
    ring = sum(boost(db) * np.sin(2 * np.pi * hz * t) * np.exp(-np.pi * width * t)
               for hz, width, db in POT_RINGS)
    ringing = signal.oaconvolve(x, ring[None] / np.linalg.norm(ring), axes=1)[:, :N]
    return x + pocket + boost(ring_db) * ringing


def hiss(spectrum, level_db, patchy_db, flicker_db, size=512):
    """Random short-time spectra with drifting patches and a flicker shared by all pitches."""
    hop = size // 4
    frames, hz = N // hop + 5, np.fft.rfftfreq(size, 1 / SR)
    a, b, c, d, patches = rng.standard_normal((frames, len(hz), 5)).T
    patches = evened(uniform_filter1d(uniform_filter1d(patches, size=8, axis=0), size=8, axis=1))
    flicker = evened(uniform_filter1d(rng.standard_normal(frames), size=4))
    same = np.clip(read(PORT_LIKENESS, hz), -1, 1)[:, None]
    left = a + 1j * b
    right = same * left + np.sqrt(1 - same ** 2) * (c + 1j * d)
    shape_db = read(spectrum, hz)[:, None] + patchy_db * patches + flicker_db * flicker
    z = np.array([left, right]) * boost(shape_db)
    noise = signal.istft(z, nperseg=size, noverlap=size - hop)[1][:, :N]
    return boost(level_db) * evened(noise)


def sizzle():
    """Noise of countless bubbles, of fine spray and of the low simmer, each following its frying level."""
    t = np.arange(N) / SR
    bubbling = hiss(BUBBLING_COLOUR, steam_level(t) - 14.5, 2.2, 3)
    spitting = hiss(SPITTING_COLOUR, spray_level(t) - 3.5, 2.44, 2.5)
    simmer = hiss(SIMMER_COLOUR, simmer_level(t) - 6, 3, 3, size=1024)
    return bubbling + spitting + simmer


def knocks(scrape_db=-6.0, scrape_hz=800, db_per_octave=11):
    """A soft blade or pepper rubs into the pot wall and rings its low modes; the rub itself is heard too."""
    s, db, length, bright_db = np.transpose(KNOCKS)[:, :, None]
    t = np.arange(7000) / SR
    push = rng.standard_normal((len(s), 7000)) * np.sin(np.pi * np.clip(t / length, 0, 1) ** 0.53)
    wall = sum(boost(d + bright_db * np.log2(hz / 400) - 60 * t / t60) * np.sin(2 * np.pi * hz * t)
               for hz, d, t60 in WALL_MODES)
    rings = signal.fftconvolve(push, wall, axes=1)[:, :7000]
    # brighter knocks scrape higher
    top_hz = scrape_hz * 2 ** np.clip(bright_db[:, 0] / db_per_octave, -1, 1.3)
    scrape = np.array([filtered(p, 2, [0.33 * hz, hz], "band") for p, hz in zip(push, top_hz)])
    rings = rings / abs(rings).max(1, keepdims=True)
    scrape = scrape / abs(scrape).max(1, keepdims=True)
    return scatter(s[:, 0], boost(db) * (rings + boost(scrape_db) * scrape))


def kitchen(x):
    """Echoes in the pot and off the walls: three noisy tails fed in turn, each band dying at its own speed."""
    out = np.zeros((2, N))
    for k in range(3):
        hz, t, z = signal.stft(rng.standard_normal((2, 9000)), SR, nperseg=64)
        fade = boost(-60 * t / read(ECHO_TIMES, hz)[:, None])
        tail = signal.istft(z * fade, SR, nperseg=64)[1]
        tail[:, :60] = 0  # the echo starts a little late
        turn = np.sqrt(2 / 3) * np.cos(np.pi * (23 * np.arange(N) / SR + k / 3))
        out += signal.oaconvolve(x * turn, tail / np.linalg.norm(tail[0]), axes=1)[:, :N]
    return out


def jolts():
    """The stove top gives once under a push: one swing out, abruptly, and a smaller one back."""
    s, db, hz = np.transpose(JOLTS)
    turns = hz[:, None] * np.arange(2000) / SR
    swing = np.sin(2 * np.pi * turns ** 0.75) * np.exp(-turns / .5)
    low_thump = scatter(s, 3.05 * boost(db)[:, None] * swing)
    return low_thump * boost([[-7], [2.5]])  # left, right in dB


def engine_drone(rows, waver_db=2.0, third_db=-9):
    """Firing tone and two overtones, kept weak as walls dull them; uneven firing makes them waver."""
    s, *columns = np.transpose(rows)
    t = np.arange(N) / SR
    hz, db, over_db = (np.interp(t, s, c) for c in columns)
    phase = 2 * np.pi * np.cumsum(hz) / SR
    fade = np.clip(np.minimum(t - s[0], s[-1] - t) / 0.011, 0, 1)
    waver = boost(waver_db * evened(uniform_filter1d(rng.standard_normal(N), size=2500)))
    overtones = boost(over_db) * (np.sin(2 * phase) + boost(third_db) * np.sin(3 * phase))
    return np.sqrt(2) * fade * waver * boost(db) * (np.sin(phase) + waver * overtones)


def street():
    """All stretches of engine drone; the street is nearer the right port, which hears them 30 samples sooner."""
    drone = sum(engine_drone(rows) for rows in ENGINE_DRONES)
    return np.array([drone, np.roll(drone, -30)])


def rumble():
    """A low rumble: patchy noise around a steady level."""
    return hiss(RUMBLE_COLOUR, -57.5, 5.0, 0.85, size=4096)


def brief_dip():
    """Gain over time: the level dips briefly to a twentieth."""
    middle_s, half_s = DIP
    t = np.arange(N) / SR
    return np.clip(2 * abs(t - middle_s) / half_s - 1, .05, 1)


def scene():
    """Pops and spits ring the pot, echo with the knocks, and join the sizzle, stove and street."""
    loud = pops(*np.transpose(LOUD_POPS)) + spits(*np.transpose(LOUD_SPITS), size=1800)
    frying = pot(loud + crackle())
    close = frying + boost(-3) * knocks()
    mix = close + boost(-10) * kitchen(close)
    mix += sizzle() + jolts() + street() + rumble()
    return mix * brief_dip()


def low_pass(x):
    """Removes everything above the highest recorded frequency."""
    return signal.sosfilt(signal.butter(12, 16800, fs=SR, output="sos"), x)


def record(dry):
    """The camera body shades the left port, which hears a little late; band limits and soft clipping follow."""
    hz = np.fft.rfftfreq(N, 1 / SR)
    shade = boost(read(SHADE, hz) * np.array([[.8], [-.2]]))  # split between left and right
    delay = np.exp(-2j * np.pi * hz * np.array([[.00004], [0]]))  # seconds, left and right
    low_edge = hz ** 2 / (hz ** 2 + 40 ** 2)
    high_edge = 1 / (1 + (hz / 15600) ** 70)
    heard = irfft(rfft(dry) * shade * delay * low_edge * high_edge, N)
    return low_pass(np.tanh(heard))


dry = scene()
out = record(dry)
output_pcm(out)
```